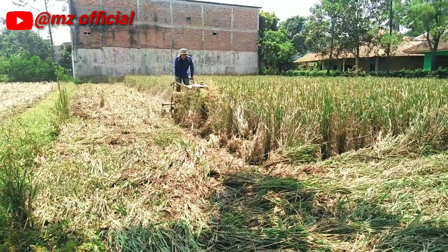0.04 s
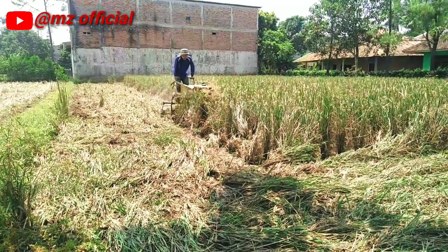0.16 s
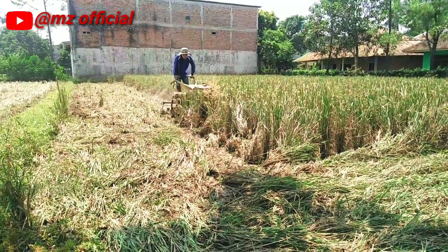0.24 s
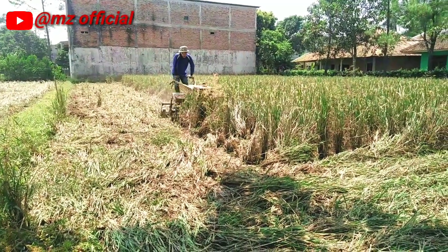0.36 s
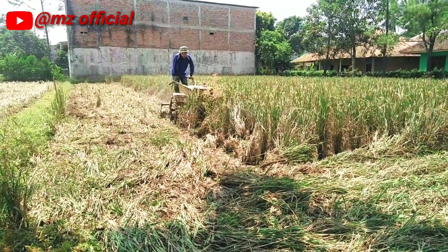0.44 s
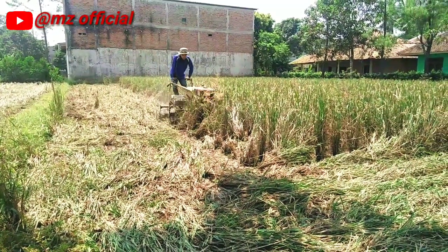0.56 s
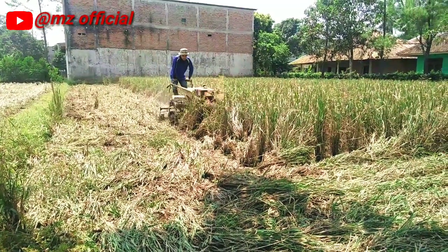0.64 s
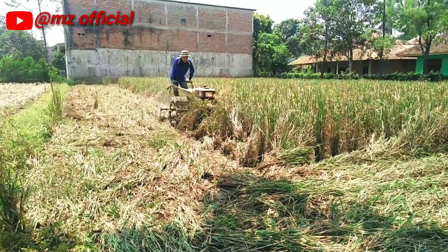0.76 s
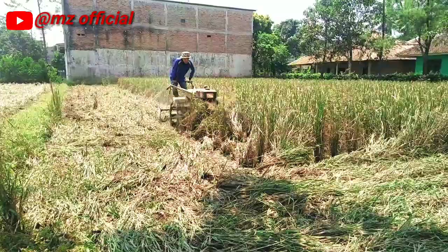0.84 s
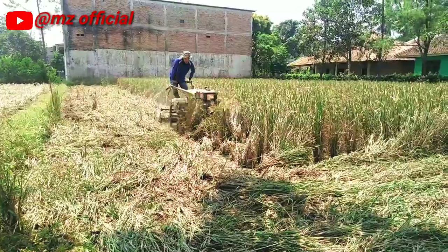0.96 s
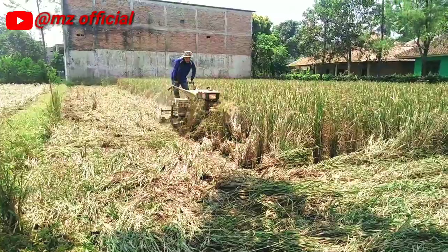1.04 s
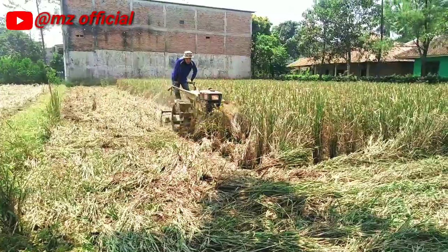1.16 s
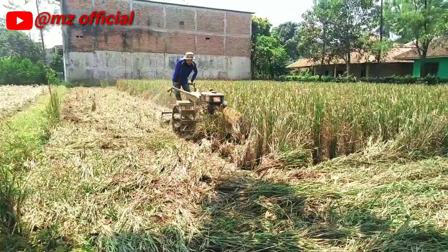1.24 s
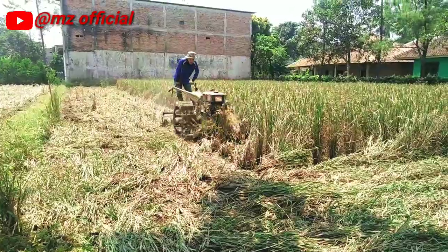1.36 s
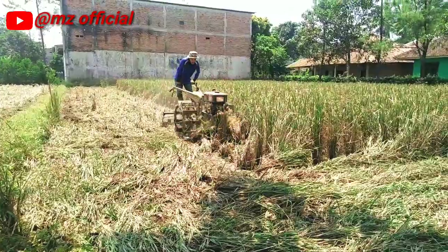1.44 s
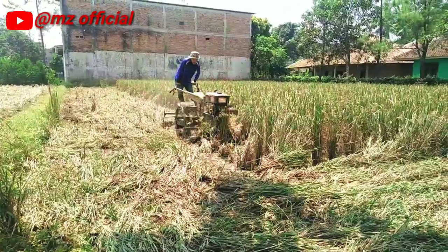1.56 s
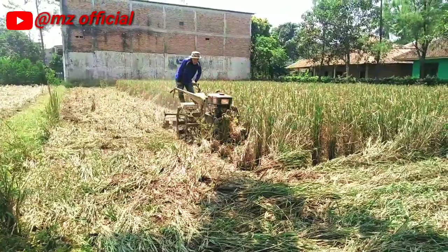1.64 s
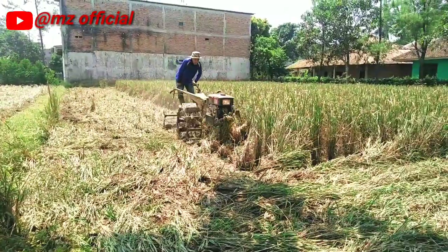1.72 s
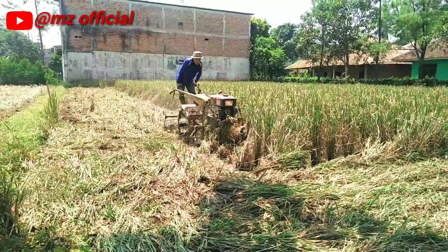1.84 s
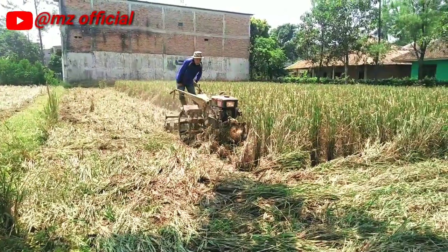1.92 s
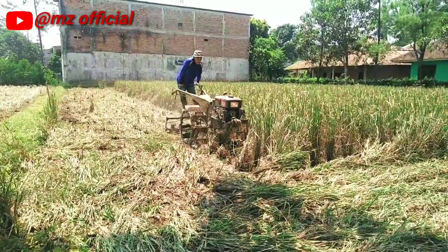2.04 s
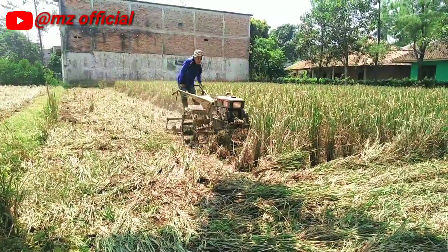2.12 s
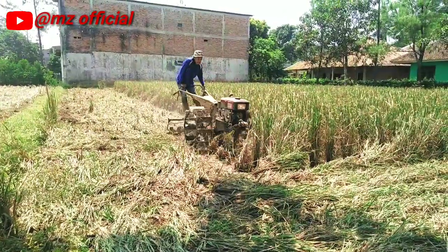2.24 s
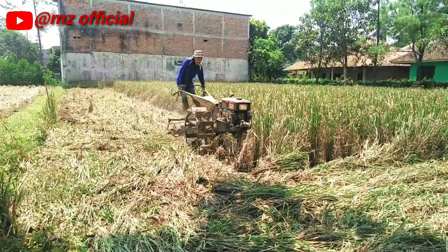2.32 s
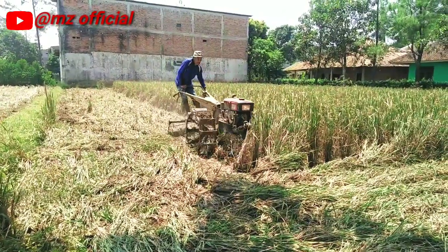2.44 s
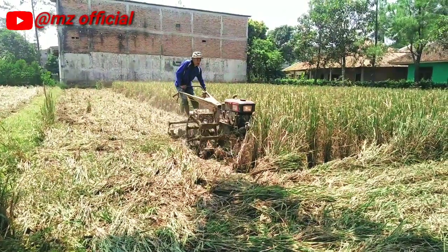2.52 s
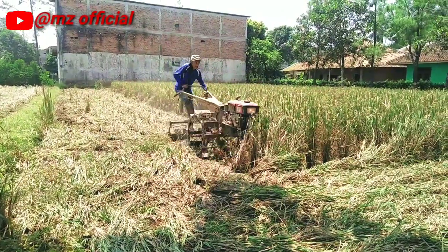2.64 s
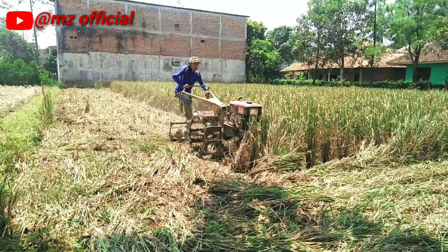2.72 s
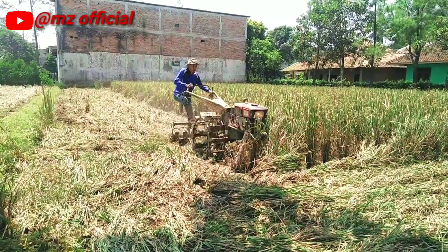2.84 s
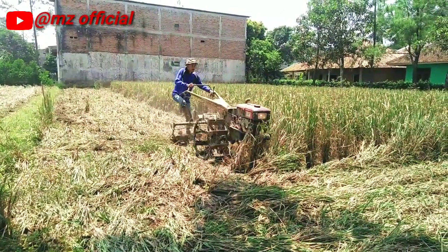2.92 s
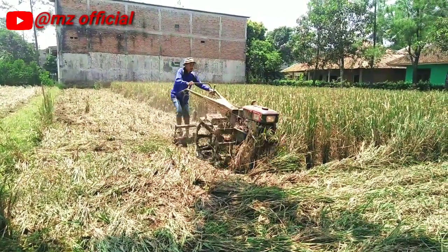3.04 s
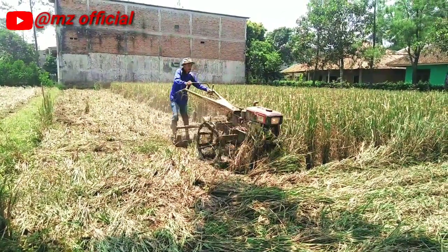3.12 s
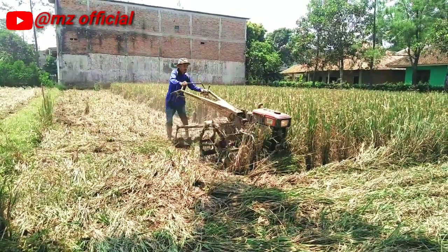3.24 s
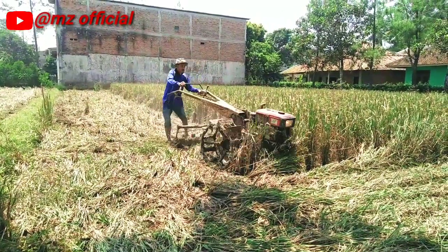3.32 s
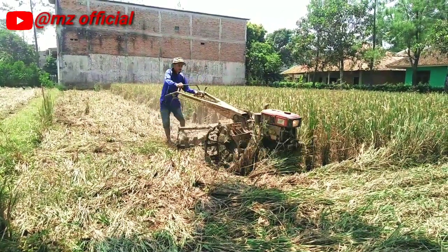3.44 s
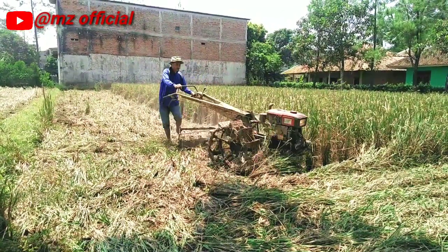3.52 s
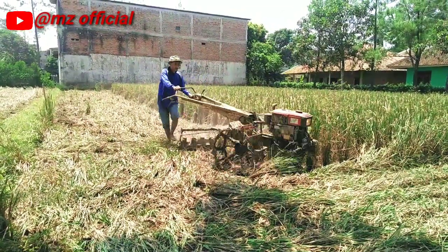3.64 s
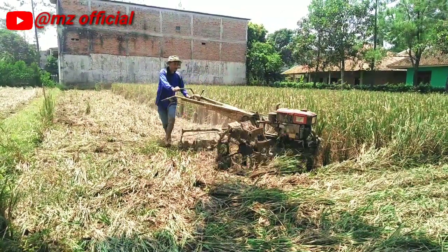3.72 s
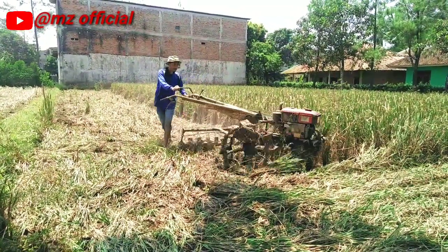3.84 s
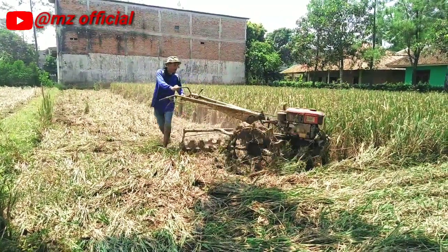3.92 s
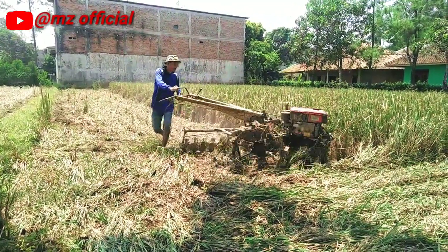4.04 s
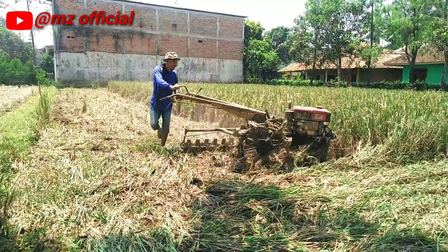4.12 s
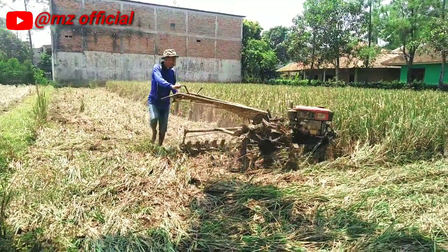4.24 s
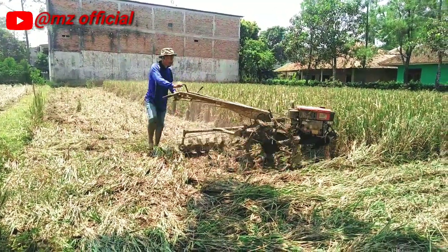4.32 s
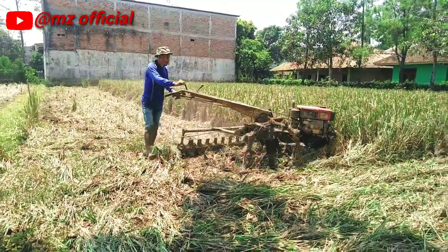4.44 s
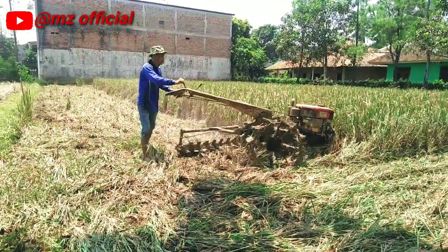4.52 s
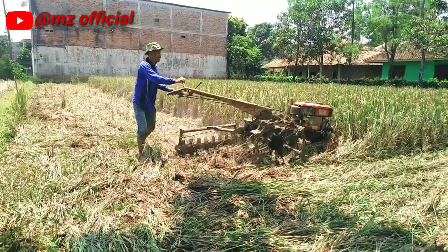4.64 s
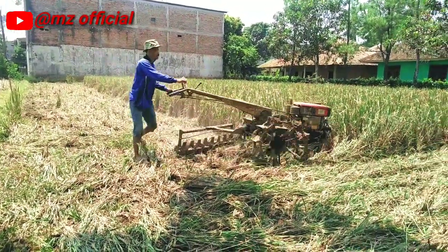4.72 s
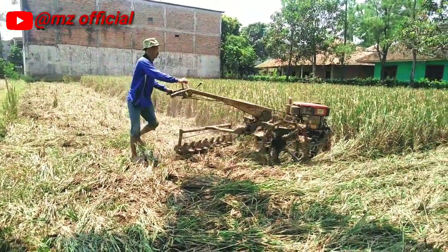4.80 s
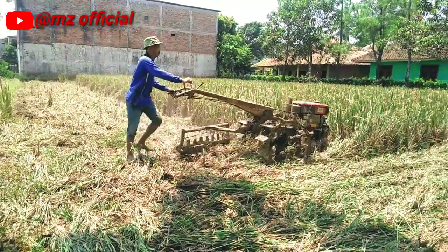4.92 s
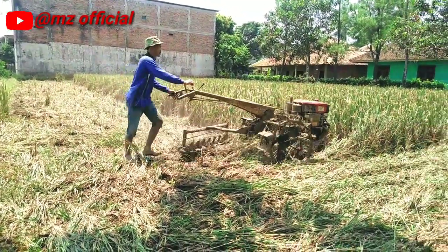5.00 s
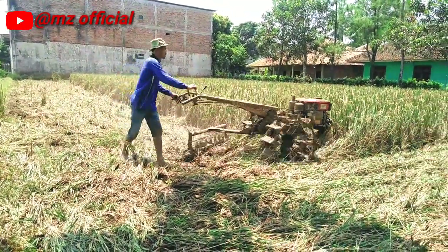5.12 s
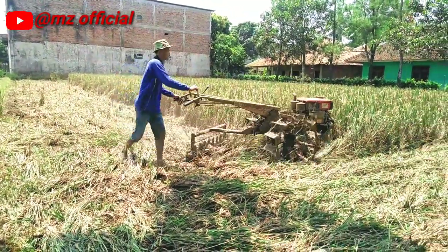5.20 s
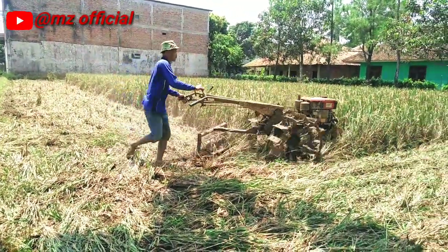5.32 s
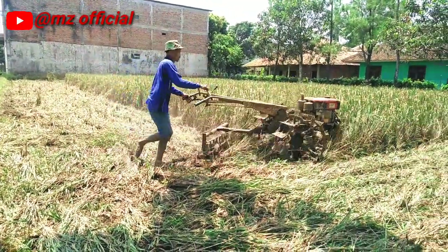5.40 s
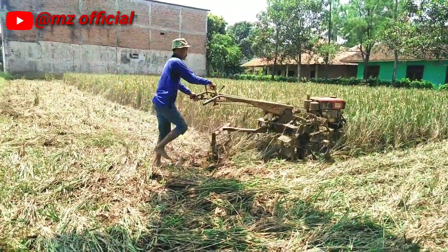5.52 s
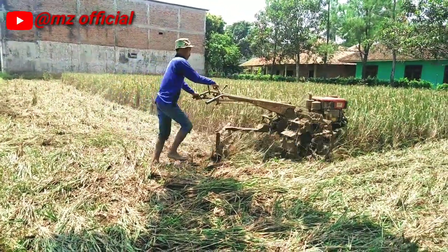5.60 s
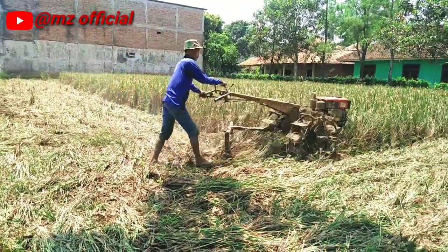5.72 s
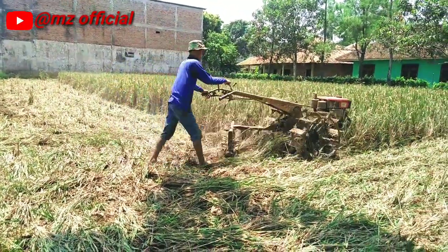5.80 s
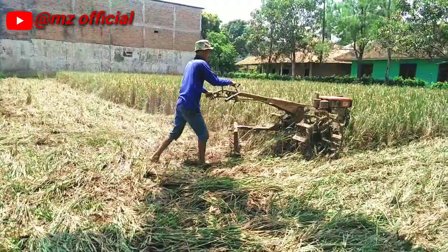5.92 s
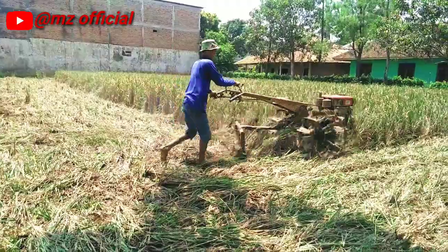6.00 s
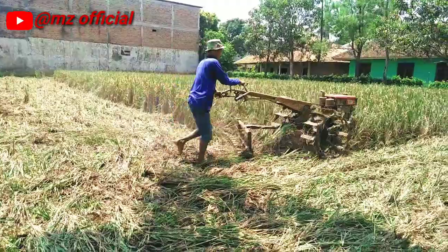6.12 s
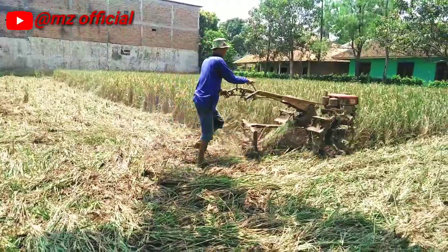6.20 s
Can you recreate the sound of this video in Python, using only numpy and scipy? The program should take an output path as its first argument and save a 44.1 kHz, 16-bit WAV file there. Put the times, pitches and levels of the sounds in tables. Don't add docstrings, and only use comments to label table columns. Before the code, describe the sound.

Outdoors in a straw field, a single-cylinder diesel walking tractor runs throughout, already working at the start and still running at the cut just after 6 seconds. It fires about twelve times a second: a sharp iron knock, lighter valve clacks, then soft low exhaust thuds and a short hollow pipe ring. From 0 to 2 seconds it is farther away, knocking and dry, its thuds swelling with load. Between 2.6 and 3.2 the exhaust swings round and the thuds deepen; gears and wheels grind more thickly. Around 4.1 the silencer shell rings most strongly, then eases, while the clatter stays close and rough. Wind flutters low, with blunt microphone thumps near 2.5, a snap at 2.9, the hardest slap near 4.15 and softer bumps to 4.6. Faint straw crackles come from 4.7, the clearest snap at 6.15. Thin hiss lies beneath.

```python
import sys
import numpy as np
from scipy import signal
from scipy.fft import rfft, irfft
from scipy.io import wavfile
from scipy.ndimage import uniform_filter1d

SR = 44100
rng = np.random.default_rng(int(sys.argv[2]) if len(sys.argv) > 2 else 0)


def generate_wav(sig):
    pcm = np.round(np.clip(np.atleast_2d(sig).T, -1, 1) * 32767).astype(np.int16)
    wavfile.write(sys.argv[1], SR, pcm)


def boost_factor(decibels):
    exponent = np.asarray(decibels, float) / 20
    return 10 ** exponent


N = 276066


def rms_one(x):
    return x / np.sqrt(np.mean(x ** 2) + 1e-20)


def in_time(rows):
    s, *columns = np.transpose(rows)
    return [np.interp(np.arange(N) / SR, s, column) for column in columns]


def drift(rate):
    knots = rng.standard_normal(int(N / SR * 60) + 2)
    return np.interp(np.arange(N) / SR * rate, np.arange(len(knots)), knots)


def coloured(points):
    hz, level_db = np.transpose(points)
    bins_hz = np.arange(N // 2 + 1) * SR / N
    gain = boost_factor(np.interp(np.log(bins_hz + 1), np.log(hz), level_db))
    return rms_one(irfft(rfft(rng.standard_normal(N)) * gain, N))


def resonate(x, hz, width):
    r = np.exp(-np.pi * width / SR)
    zeros = (1 - r * r) / 2 * np.array([1, 0, -1])
    section = np.r_[zeros, 1, -2 * r * np.cos(2 * np.pi * hz / SR), r * r]
    return signal.sosfilt([section, section], x)


def clicks(seconds, sizes):
    at = np.round(np.asarray(seconds) * SR).astype(int)
    inside = (at >= 0) & (at < N)
    return np.bincount(at[inside], np.asarray(sizes)[inside], N)


def puff(hz, t60, soft_ms):
    t = np.arange(SR // 2) / SR
    turn = 2 * np.pi * hz
    fade = np.log(1000) / t60
    push = np.exp(-.5 * ((t[:SR // 50] * 1000 - 10) / soft_ms) ** 2)
    ring = (np.cos(turn * t) - fade / turn * np.sin(turn * t)) * np.exp(-fade * t)
    make_up = np.exp(.5 * (turn * soft_ms / 1000) ** 2)
    return np.convolve(push, ring) / push.sum() * make_up


def struck(train, shape):
    return signal.fftconvolve(train, shape)[SR // 100:][:N]


def gas(starts, pulses, spread_db, jitter_ms):
    out = np.zeros(N)
    for ms, hz, t60, soft_ms, level_db, sign in pulses:
        luck = rng.standard_normal((len(starts), 2))
        when = starts + (ms + jitter_ms * luck[:, 0]) / 1000
        sizes = sign * boost_factor(level_db + spread_db * luck[:, 1])
        out += struck(clicks(when, sizes), puff(hz, t60, soft_ms))
    return out


def rattle(per_s, spread_db):
    sizes = boost_factor(spread_db * np.minimum(rng.exponential(1, N), 3)) * rng.choice([-1, 1], N)
    contacts = sizes * (rng.random(N) < per_s / SR)
    return rms_one(contacts) + .5 * rng.standard_normal(N)


CYCLES_PER_S = 11.57
# time_s, lead_ms (crank ahead of steady running)
CRANK_LEAD = [(0.0, 0.8), (0.55, 0.4), (0.95, 1.9), (1.15, 0.9), (1.55, -1.7), (1.9, -2.8), (2.6, -2.6),
              (3.1, -0.4), (3.95, 12.4), (4.25, 15.1), (4.65, 17.1), (5.0, 20.2), (5.25, 20.2), (5.8, 14.2),
              (6.26, 14.2)]


def cycle_starts():
    t = np.arange(N) / SR
    done = CYCLES_PER_S * (t + in_time(CRANK_LEAD)[0] / 1000)
    inside = np.interp(np.arange(1, int(done[-1]) + 1), done, t)
    return np.r_[inside[0] - 1 / CYCLES_PER_S, inside]


# middle_s, length_s, level_db (on the thuds)
SURGES = [(0.297, 0.47, -4.5), (0.543, 0.35, 6), (1.008, 0.14, 2), (1.4, 0.28, 0), (2.052, 0.58, 5.5),
          (2.38, 0.2, 2.5), (2.59, 0.29, 7), (2.936, 0.88, 3), (3.597, 0.24, 1.5), (3.828, 0.12, 4),
          (4.007, 0.14, 1.7), (4.308, 0.47, 4), (4.71, 0.92, 4), (5.203, 0.17, 1.5), (5.85, 0.73, 0.5)]


def load_db():
    t = np.arange(N) / SR
    return sum(db * np.cos(np.pi * np.clip((t - s) / length, -.5, .5)) ** 2 for s, length, db in SURGES)


# after_start_ms, pitch_hz, t60_s, softness_ms, level_db, sign (push or pull)
THUDS_FAR = [
    (29, 91, .042, 1.17, -25.5, -1),
    (53.4, 148, .07, 1.36, -28.4, 1),
    (72.9, 141, .058, .86, -32.4, -1),
]
PIPE_FAR = (77.06, 201.7, .266, 1.25, -32.4, 1)
THUDS_NEAR = [
    (28.8, 88, .067, .98, -24.2, -1),
    (53.1, 140, .03, 1.22, -18.8, 1),
    (72.7, 133, .051, 1.26, -23.9, -1),
]
PIPE_NEAR = (75.7, 191.8, .155, 1.7, -28, 1)
TURN_S = (2.6, 3.2)
PIPE_FOLLOWS = 0.18


def exhaust(starts):
    pull_db = load_db()
    turn = np.interp(np.arange(N) / SR, TURN_S, (0, 1))
    thuds = [gas(starts, side, spread_db=1.2, jitter_ms=.2) for side in (THUDS_FAR, THUDS_NEAR)]
    pipe = [gas(starts, [side], spread_db=.8, jitter_ms=.1) for side in (PIPE_FAR, PIPE_NEAR)]
    far, near = [boost_factor(pull_db) * low + boost_factor(PIPE_FOLLOWS * pull_db) * ring for low, ring in zip(thuds, pipe)]
    return (1 - turn) * far + turn * near


FACING_S, SWING_IN_S, SWING_OUT_S = 4.11, 0.78, 0.62


def facing():
    t = np.arange(N) / SR - FACING_S
    return np.exp(-(t / np.where(t < 0, SWING_IN_S, SWING_OUT_S)) ** 2), t > 0


# after_start_ms, pitch_hz, t60_s, softness_ms, level_db, sign
SHELL_FAR = (75.5, 345, 0.09, 0.27, 4, 1.17)
SHELL_NEAR = (75.5, 348, 0.31, 0.58, 0.15, 1.17)
SHELL_DB, FACING_DB, AFTER_DB = -50.5, 15, 4.5


def shell(starts, near):
    square, passed = facing()
    knocked = gas(starts, [SHELL_FAR], spread_db=1.0, jitter_ms=0.074)
    ringing = gas(starts, [SHELL_NEAR], spread_db=0.5, jitter_ms=0.11)
    boost = boost_factor(FACING_DB * square + AFTER_DB * (1 - square) * passed)
    return boost_factor(SHELL_DB) * ((1 - 0.46 * near) * knocked + near * ringing * boost)


# after_start_ms, level_db, rise_ms, t60_s, spread_db
BLOWS = [
    (5.3, 2.5, 1.3, 0.075, 2),
    (36.4, -6.5, 0.72, 0.034, 2),
    (50.5, -14.5, 0.73, 0.031, 0.5),
    (62.4, -14, 1.5, 0.041, 8),
]
# pitch_hz, width_hz, far_side_db, near_side_db
BLOCK_MODES = [(1035, 115, 5, 0), (1462, 130, 7.5, 2.5), (1852, 252, -6.5, 4), (2390, 570, 5.5, -3),
               (3002, 285, -1, -2), (3344, 475, -6, -1.5), (4540, 230, -50, -47)]
QUIET_MS = (72, 92)
IGNITION_MS, IGNITION_DB = 9.5, 16.4
IRON_TOP_HZ = 4530


def block(starts, near):
    t = np.arange(SR // 4) / SR
    force = np.zeros(N)
    for ms, level_db, rise_ms, t60, spread_db in BLOWS:
        sizes = boost_factor(level_db + spread_db * rng.standard_normal(len(starts)))
        shape = (1 - np.exp(-t * 1000 / rise_ms)) * boost_factor(-60 * t / t60)
        force += signal.fftconvolve(clicks(starts + ms / 1000, sizes), shape)[:N]

    rest_on, rest_off = [clicks(starts + ms / 1000, np.ones(len(starts))) for ms in QUIET_MS]
    rest = uniform_filter1d(np.cumsum(rest_on - rest_off), size=300)
    clatter = boost_factor(-17.5 + 11.1 * near - (3.5 - 4.2 * near) * rest + 1.7 * drift(25))
    drive = (force + clatter) * rattle(per_s=5000, spread_db=2.4)
    ignition = starts + IGNITION_MS / 1000
    drive += clicks(ignition, boost_factor(IGNITION_DB + 0.6 * rng.standard_normal(len(starts))))

    cycle = np.searchsorted(starts + .006, np.arange(N) / SR)
    out = np.zeros(N)
    for k, (hz, width, far_db, near_db) in enumerate(BLOCK_MODES):
        colour_db = .7 * rng.standard_normal(len(starts) + 1)[cycle] + 1.4 * drift(35)
        mode_db = far_db + near * (near_db - far_db) + colour_db
        out += (-1) ** k * resonate(drive * boost_factor(mode_db), hz, width)

    clack = clicks(ignition, boost_factor(IGNITION_DB + 1.5 * rng.standard_normal(len(starts))))
    out += (1 - near) * boost_factor(21.5) * resonate(clack, 2400, 170)
    out += near * boost_factor(15.0) * resonate(clack, 3417, 220)
    out = signal.sosfilt(signal.butter(4, IRON_TOP_HZ, fs=SR, output="sos"), out)
    return rms_one(out), force


def over_ground(x, lag_ms, share):
    late = np.interp(np.arange(N) - lag_ms * SR / 1000, np.arange(N), x)
    return x + share * late


# after_start_ms, pitch_hz, t60_s, softness_ms, level_db, sign (push or pull)
FRAME_FAR = [(8.21, 465, 0.042, 0.27, -49, 1), (8.6, 639, .05, 0.27, -51.5, -1.1),
             (9.1, 1015, 0.069, 0.11, -52, 0.93), (8, 1459, 0.056, 0.056, -52.5, -1.03),
             (8, 3700, 0.1, .04, -67.5, 0.69)]
FRAME_NEAR = [(9.04, 465, 0.093, 0.3, -48, 1), (9, 644, 0.045, .2, -59.5, -1.1),
              (8.42, 1100, 0.067, 0.13, -56.5, 0.95), (68.03, 253, 0.18, 0.21, -47, 0.095)]


def frame(starts, near):
    far_ring = gas(starts, FRAME_FAR, spread_db=1.5, jitter_ms=0.15)
    near_ring = gas(starts, FRAME_NEAR, spread_db=1.0, jitter_ms=0.044)
    return (1 - near) * far_ring + near * near_ring


# pitch_hz, width_hz, far_side_db, near_side_db
CHURN_MODES = [(236, 52, -10.5, 9.5), (300.5, 69, -7, -1), (467, 59, 1.2, 4), (664.6, 108, -4.5, 4.5),
               (738.7, 129, -7, 2), (881, 130, -27, -4.5)]
BELT_HZ, BELT_WIDTH_HZ, BELT_DB = 787, 214, -1.5


def churn(force, near):
    drive = rattle(per_s=2500, spread_db=0.0) * boost_factor(1.36 * drift(12)) * (1 + 0.53 * force)
    out = facing()[0] * boost_factor(BELT_DB) * resonate(drive, BELT_HZ, BELT_WIDTH_HZ)
    for hz, width, far_db, near_db in CHURN_MODES:
        out += boost_factor(far_db + near * (near_db - far_db)) * resonate(drive, hz, width)
    return rms_one(out)


# pitch_hz, level_db (per Hz)
WIND_COLOUR = [(20, -4), (40, -9.5), (100, -9), (200, -5), (260, -24.5), (400, -24), (900, -54.5),
               (3000, -94)]
# peak_s, level_db, dying_s
GUSTS = [(.44, -46, 0.058), (.68, -58, 0.069), (.82, -55, 0.25), (1.92, -58, 0.067), (2.37, -47, 0.034),
         (2.51, -58, 0.24), (2.93, -39.5, 0.041), (3.3, -42, 0.12), (3.839, -40.5, .2), (4.08, -54, 0.065),
         (4.17, -33.5, 0.042), (4.27, -40, 0.19), (4.599, -39.5, 0.45), (5.3, -43, 0.17),
         (5.77, -40, 0.028), (5.94, -37.5, 0.44)]
BREEZE_DB, GUST_RISE_S = -50.5, .05


def wind():
    t = np.arange(N) / SR
    strength = boost_factor(BREEZE_DB)
    for s, level_db, dying in GUSTS:
        strength = strength + boost_factor(level_db) * np.exp(np.where(t < s, (t - s) / GUST_RISE_S, (s - t) / dying))
    return strength * boost_factor(2.5 * drift(18)) * coloured(WIND_COLOUR)


# pitch_hz, level_db (per Hz)
HISS_COLOUR = [(2650, -10), (4500, -2), (6450, -5.5), (10400, -6), (12300, -7.5), (14600, -6.5),
               (15400, -9.5)]


def hiss():
    return boost_factor(-74.3) * coloured(HISS_COLOUR)


# time_s, thud_db, pitch_hz, softness_ms, snap_db
PUSHES = [
    (2.5108, -14, 200, 0.7, -45),
    (2.5146, -16.5, 72, 1.0, -50),
    (4.255, -21, 70, 1.5, -55),
    (4.64, -24, 90, 1.5, -55),
    (4.1526, -10.5, 92, .45, -24),
]
PULLS = [
    (.461, -31, 90, 2.7, -60),
    (2.509, -13.5, 117, 1.5, -62),
    (2.718, -33, 106, 1.5, -23.5),
    (2.892, -23, 100, 0.73, -18),
    (2.933, -23.5, 105, 0.97, -36),
    (4.595, -31, 100, 1.1, -26.5),
]


def buffets():
    out = np.zeros(N)
    for sign, slaps in ((0.85, PUSHES), (-1.5, PULLS)):
        for s, thud_db, hz, soft_ms, snap_db in slaps:
            thud = puff(hz, .045, np.clip(soft_ms, .2, 3))
            snap = puff(302, 0.0054, 0.46)
            out += struck(clicks([s], [sign * boost_factor(thud_db)]), thud)
            out += struck(clicks([s], [sign * boost_factor(snap_db)]), snap)
    return out


# start_s, length_s, level_db, pitch_hz
RUSTLES = [
    (4.68, 0.033, -78, 7900),
    (4.943, 0.081, -75, 4800),
    (5.148, 0.069, -77, 7800),
    (5.2, 0.27, -74, 4800),
    (5.368, .14, -82, 9000),
    (5.894, 0.07, -75, 4380),
    (6.142, 0.034, -68, 4420),
    (6.143, 0.015, -75, 6800),
    (6.22, 0.031, -78, 8100),
]


def rustle():
    t = np.arange(N) / SR
    crackle = rattle(per_s=1000, spread_db=6.0)
    out = np.zeros(N)
    for s, length, level_db, hz in RUSTLES:
        swell = np.sin(np.pi * np.clip((t - s) / length, 0, 1))
        out += boost_factor(level_db + 10) * resonate(crackle * swell, hz, 0.27 * hz)
    return out


# time_s, closeness_db, near_side_share (0-1), ground_echo_lag_ms
APPROACH = [(0, -3, 0.3, 0.17), (0.5, -2, 0.2, 0.19), (1.1, -1, 0.08, 0.19), (1.9, 1, 0.26, 0.2),
            (2.9, 3.5, 0.67, 0.23), (3.4, 2.5, 0.68, 0.19), (3.75, -0.5, 0.55, 0.26), (4.2, 1, 0.55, 0.25),
            (4.8, 2.5, 0.62, 0.22), (5.1, 2, 0.87, 0.24), (5.4, 3.5, 0.89, 0.25), (5.8, -0.5, 1, 0.24),
            (6.26, 2.5, 0.62, 0.21)]
BLOCK_DB, WHEELS_DB = -60, -55
WHEELS_FOLLOW = 0.6


def scene():
    close_db, near, lag_ms = in_time(APPROACH)
    near = np.clip(near, 0, 1)
    starts = cycle_starts()
    starts = np.r_[starts[0] - 1 / CYCLES_PER_S, starts]
    ringing = shell(starts, near)
    iron, force = block(starts, near)
    engine = exhaust(starts) + ringing
    engine += boost_factor(BLOCK_DB + close_db) * over_ground(iron, lag_ms, share=0.44)
    engine += boost_factor(close_db) * frame(starts, near)
    wheels = boost_factor(WHEELS_DB + WHEELS_FOLLOW * close_db) * churn(force, near)
    return (engine + wheels + rustle() + wind() + buffets() + hiss())[None]


def low_pass(x):
    return signal.sosfilt(signal.butter(12, 15560, fs=SR, output="sos"), x)


PATCH_FROM_HZ, PATCH_SHARE, PATCH_DB = 12600, .33, -20
EDGE_S = .004


def record(dry):
    fade = np.clip(np.minimum(np.arange(N), np.arange(N)[::-1]) / (EDGE_S * SR), 0, 1)
    hz, _, cells = signal.stft(dry * fade, SR, nperseg=1024)
    blank = rng.random((len(hz) // 5 + 1, cells.shape[-1] // 2 + 1)) < PATCH_SHARE
    blank = blank.repeat(5, axis=0).repeat(2, axis=1)[:len(hz), :cells.shape[-1]]
    blank = blank & (hz > PATCH_FROM_HZ)[:, None]
    cells = cells * np.where(blank, boost_factor(PATCH_DB), 1)
    patchy = signal.istft(cells, SR, nperseg=1024)[1][:, :N]
    return low_pass(patchy)


dry = scene()
out = record(dry)
generate_wav(out)
```